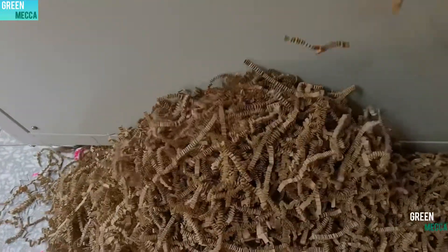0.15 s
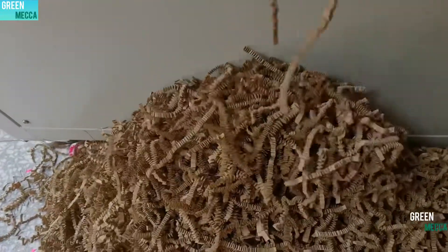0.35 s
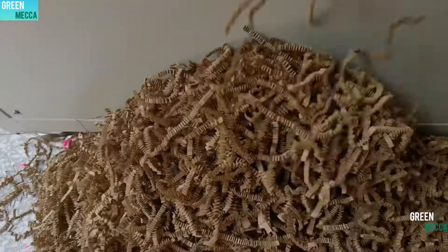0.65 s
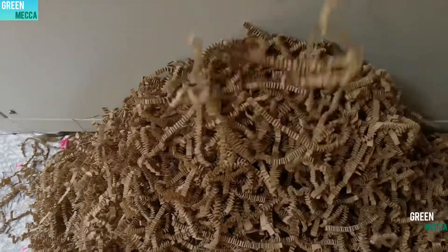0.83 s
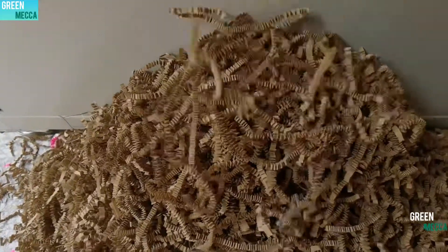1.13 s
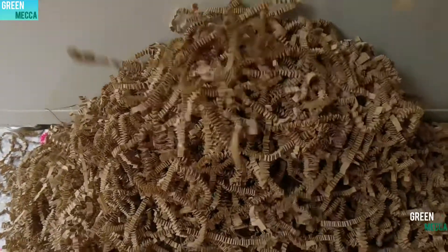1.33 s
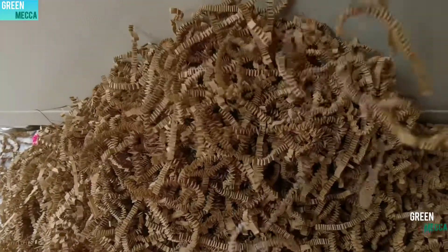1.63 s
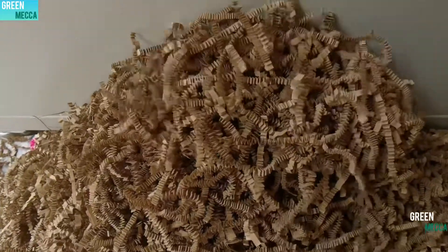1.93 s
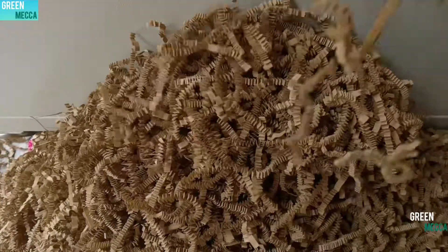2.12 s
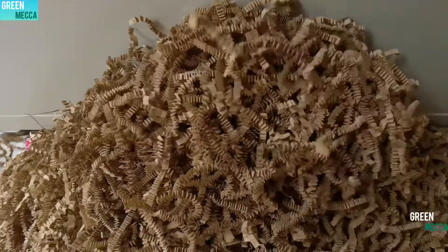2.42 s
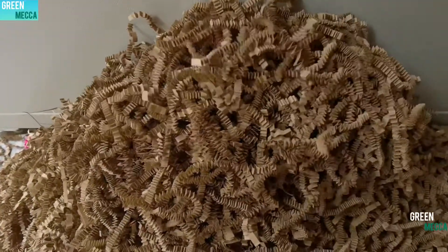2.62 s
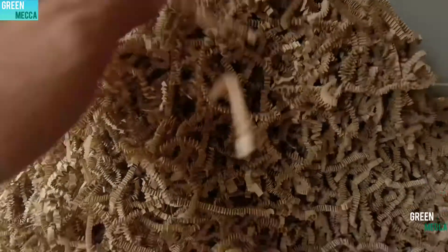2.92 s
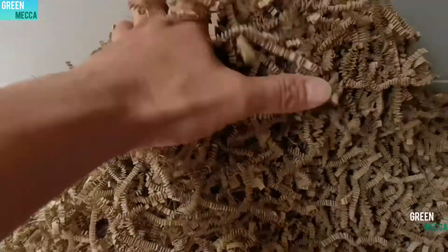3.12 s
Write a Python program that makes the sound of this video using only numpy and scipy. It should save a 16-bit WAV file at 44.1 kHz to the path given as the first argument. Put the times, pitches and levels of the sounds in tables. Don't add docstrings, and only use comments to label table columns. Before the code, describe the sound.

Close stereo pickup of a shredding machine indoors: constant low mains hum, muffled casing roar, faint wavering bearing whine and fine rattle, with scattered dull knocks of falling strips and a tiny squeak at the end.

```python
import sys
import numpy as np
from scipy import signal
from scipy.fft import rfft, irfft, next_fast_len
from scipy.io import wavfile
from scipy.ndimage import uniform_filter1d, map_coordinates

SR = 44100
rng = np.random.default_rng(int(sys.argv[2]) if len(sys.argv) > 2 else 0)


def generate_wav(signal):
    frames = np.transpose(np.atleast_2d(signal))
    scaled = np.clip(frames, -1, 1) * 32767
    pcm = np.round(scaled).astype(np.int16)
    wavfile.write(sys.argv[1], SR, pcm)


def volts(x):
    e = np.asarray(x, float) / 20
    return 10 ** e


N = 143766

# t/s, hum level/dB, octave level/dB
MAGNETIC_PULL = [(0.1, -10, -36.5), (0.32, -12, -40.5), (0.39, -13, -31.5), (0.66, -9, -35),
                 (0.69, -10.5, -34), (0.9, -12.5, -32.5), (1.28, -9, -39), (1.47, -15, -32),
                 (1.75, -10, -34.5), (1.77, -9.5, -38.5), (2.1, -13, -30.5), (2.17, -10.5, -44),
                 (2.25, -10, -34), (2.32, -9, -46), (2.6, -13, -31.5), (2.89, -9, -37), (2.94, -11, -37),
                 (3.15, -12, -33.5)]
# multiple of the hum, level/dB, left minus right/dB
HUM_OVERTONES = [(4, -40.5, 20)]
# multiple of the rotor rate, level/dB, left minus right/dB
ROTOR_LINES = [(21, -56.5, 7), (27, -49.5, -2), (29, -52, 9)]
# t/s, third overtone level/dB, frame mode level/dB, slot line level/dB, lid mode level/dB
FRAME_STRAIN = [(0.0, -51, -40, -45, -44), (0.04, -37, -24, -51, -53), (0.14, -39, -44, -40, -31),
                (0.24, -59, -31, -46, -38), (0.56, -32.5, -42, -48, -36), (0.6, -40, -32, -47, -58),
                (0.68, -36, -43, -38, -34.5), (1.71, -41, -43, -45.5, -54), (1.76, -26, -40, -53, -50),
                (1.82, -59, -33, -35, -39), (1.95, -36.5, -55, -41.5, -54), (2.21, -40, -31, -48, -48),
                (2.45, -37.5, -54, -44, -33), (2.55, -32, -42, -57, -58), (2.65, -49, -46, -55, -42),
                (2.83, -43.5, -34.5, -36, -41), (3.11, -38.5, -54, -48, -55), (3.26, -45, -47, -34, -48)]
# order, level/dB
MESH_ORDERS = [(2, -43), (3, -31.5), (4, -40), (5, -47.5), (8, -43.5), (9, -46), (10, -98)]
# t/s, cutting level/dB, bearing level/dB, air level/dB, frame shake level/dB
MACHINE_LOAD = [(0.05, -37, -43.5, -55, -23), (0.23, -33, -60, -51.5, -39), (0.29, -39, -39, -56, -29),
                (0.41, -39.5, -54, -52, -23), (0.51, -37.5, -42, -55, -21.5), (0.7, -33, -48.5, -51.5, -32),
                (1.0, -37.5, -55, -55, -30.5), (1.03, -32.5, -44, -53, -31.5),
                (1.36, -37, -55.5, -54, -29.5), (2.08, -35, -54, -54, -31.5), (2.13, -35, -50, -52, -40),
                (2.21, -35, -61, -53.5, -15.5), (2.25, -36, -47, -53.5, -28), (2.43, -34, -48, -53, -31),
                (2.56, -38, -58, -55.5, -26), (2.84, -32.5, -47, -53, -29.5), (2.91, -34, -43, -52, -40.5),
                (3.15, -40.5, -48.5, -54.5, -31)]
# f/Hz, level/dB
RUMBLE_COLOUR = [(20, -120), (30, -9.5), (70, -17.5), (115, -3), (140, 1.5), (165, -6.5), (190, -1),
                 (240, -9), (300, -120)]
# f/Hz, level/dB
ROAR_COLOUR = [(150, -120), (240, -3.5), (310, -1.5), (430, -5.5), (550, -12), (620, -4.5), (720, -6),
               (800, -12), (1500, -14), (1750, -120)]
# f/Hz, level/dB
HISS_COLOUR = [(1200, -120), (1600, 0.5), (2400, -1.5), (4000, -3), (5000, -5), (6000, -3), (7600, -8),
               (8600, -22.5), (10000, -120)]
# f/Hz, level/dB
AIR_COLOUR = [(6000, -120), (8000, -1.5), (9400, -3.5), (10200, -0.5), (11500, -4), (12300, 0), (14600, -1),
              (15750, 2)]
PANEL_HZ = [860, 1100, 1330, 1535, 2290, 2772, 4530, 5820, 10185, 14060]
# bandwidth/Hz, level/dB
PANEL_RINGS = [(77, -53), (60, -49), (80, -49.5), (45, -48), (170, -51), (55, -53.5), (90, -57.5),
               (260, -54.5), (80, -63), (150, -62)]
# f/Hz, bandwidth/Hz, level/dB
ROOM_MODES = [(137.5, 4.7, -47), (180.3, 3.5, -39), (228, 6.4, -49.5), (248.3, 3.1, -45.5),
              (409, 12, -54.5), (440.4, 7.7, -42.5), (499, 42, -45), (602.5, 11, -50)]
# f/Hz, bandwidth/Hz, level/dB
CROSS_MODE = (163, 8, -47)
# f/Hz, coherence
COHERENCE = [(30, .93), (130, .995), (290, .85), (640, .65), (1410, .3), (3100, .3), (6820, .25),
             (15000, .3)]
# f/Hz, left minus right/dB
LEFT_LEAN = [(60, 1.3), (140, 1.8), (220, 3.5), (380, 5.5), (700, 4.5), (1290, 5.5), (2380, 3.5), (5000, 6),
             (9000, 2), (15000, 1.5)]
# t/s, duration/s, level/dB, f/Hz
SLIDES = [
    (.12, .17, -38, 1150),
    (0.803, 0.063, -40, 3240),
    (3.1, 0.1, -47, 2037),
    (1.077, 0.086, -50, 1200),
    (1.6, 0.13, -52, 1300),
    (2.303, 0.16, -50, 1200),
]
# t/s, peak level/dB, f/Hz
KNOCKS = [(0.196, -32, 960), (.658, -20, 860), (.82, -26, 666), (0.835, -31, 3180), (.77, -34, 640),
          (.873, -35, 700), (0.57, -30, 301), (1.068, -30, 401), (2.158, -28, 385), (2.677, -31, 716),
          (2.737, -19, 393), (1.312, -27.5, 1450), (1.755, -31, 1350), (1.85, -24.5, 696),
          (2.715, -30.5, 2200), (2.88, -29, 690), (3.164, -26, 750)]

HUM_HZ, HUM_PEAK_S = 99.96, -.0013
ROTOR_HZ, CUTTER_HZ = 24.99, 1.79
MESH_HZ, MESH_PEAK_S = 35.89, -.00024
WHINE_HZ = 4275
PORT_LAG_S = .00017


def unit(x):
    return x / np.sqrt(np.mean(x ** 2) + 1e-20)


def along(points, hz):
    f, v = np.transpose(points)
    return np.interp(np.log(hz + 1), np.log(f + 1), v)


def curves(rows):
    s, *cols = np.transpose(rows)
    t = np.arange(N) / SR
    return [uniform_filter1d(np.interp(t, s, c), size=2000) for c in cols]


def wobble(rate):
    knots = rng.standard_normal(int(N * rate / SR) + 4)
    return map_coordinates(knots, [np.arange(N) * rate / SR])


def filtered(x, response):
    m = next_fast_len(N + 8192)
    return irfft(rfft(x, m) * response(np.fft.rfftfreq(m, 1 / SR)), m)[..., :N]


def tone(cycles, pan_db, lead):
    half = np.array([[.5], [-.5]])
    return np.sqrt(2) * volts(pan_db * half) * np.cos(2 * np.pi * cycles + lead * half)


def rush(gain, patchy_db=0):
    z = signal.stft(rng.standard_normal((2, N)), nperseg=512)[2]
    field = rng.standard_normal(z.shape[1:])
    field = uniform_filter1d(uniform_filter1d(field, size=6, axis=0), size=10, axis=1)
    pair = signal.istft(z * volts(patchy_db * unit(field)), nperseg=512)[1][:, :N]

    def mid_side_gain(hz):
        turn = np.arccos(np.clip(along(COHERENCE, hz), -1, 1)) / 2
        return gain(hz) * np.array([np.cos(turn), np.sin(turn)])

    def placing(hz):
        lean = volts(along(LEFT_LEAN, hz) * [[.5], [-.5]])
        quarter_at_most = np.minimum(hz * PORT_LAG_S, 1 / 4)
        return lean * np.exp(1j * np.pi * quarter_at_most * [[1], [-1]])

    mid, side = filtered(pair, mid_side_gain)
    return unit(filtered(np.array([mid + side, mid - side]), placing))


def ringing(modes, patchy_db):
    hz, width, db = np.transpose(modes)[..., None]

    def gain(f):
        power = volts(db) ** 2 / width / (1 + (2 * (f - hz) / width) ** 2) ** 2
        return np.sqrt(np.sum(power, axis=0))

    return np.linalg.norm(volts(db)) * rush(gain, patchy_db=patchy_db)


def load():
    cut_db, bearing_db, air_db, shake_db = curves(MACHINE_LOAD)
    t = np.arange(N) / SR
    return t, cut_db - cut_db.mean(), bearing_db, air_db - air_db.mean(), shake_db - shake_db.mean()


def motor():
    t, (hum_db, octave_db) = np.arange(N) / SR, curves(MAGNETIC_PULL)
    shake_db = load()[4]
    cycles = HUM_HZ * (t - HUM_PEAK_S)
    out = volts(hum_db) * tone(cycles, 1.9, .18)
    waver_db, drift = 3 * wobble(22), .05 * wobble(8)
    out += volts(octave_db + 3.5 + waver_db) * tone(2 * cycles + drift, 4.5, 0.069)
    for k, db, pan_db in HUM_OVERTONES:
        level_db = hum_db.mean() + db + 4.2 * wobble(5.7) + 1.1 * shake_db
        out += volts(level_db) * tone(k * cycles + 0.22 * wobble(7.0), pan_db, 0.43)
    for k, db, pan_db in ROTOR_LINES:
        flutter_db = 2.5 * wobble(7)
        out += volts(db + flutter_db) * tone(k * ROTOR_HZ * t + rng.random(), pan_db, 0.22)
    return out


def strain():
    t, (third_db, frame_db, slot_db, lid_db) = np.arange(N) / SR, curves(FRAME_STRAIN)
    third_cycles = 3 * HUM_HZ * (t - HUM_PEAK_S) + .1 * wobble(10)
    slot_cycles = 28 * ROTOR_HZ * t + .1 * wobble(10)
    out = volts(third_db - 0.5 + 3.5 * wobble(22)) * tone(third_cycles, 3.3, 0.25)
    out += volts(slot_db - 3.5 + 3.5 * wobble(18)) * tone(slot_cycles, 2.5, 0.31)
    out += volts(lid_db) * ringing([(606, 27, -1)], patchy_db=1)
    return out + volts(frame_db) * ringing([(387, 62, -1.5)], patchy_db=3)


def gears():
    t, out = np.arange(N) / SR, 0
    for k, db in MESH_ORDERS:
        swell_db = 3.5 * np.cos(2 * np.pi * (CUTTER_HZ * t + rng.random()))
        if k == 3:
            swell_db = 0
        out = out + volts(db + swell_db) * tone(k * MESH_HZ * (t - MESH_PEAK_S), 0.61 * k, .08)
    return out


def cutters():
    t, cut_db, _, air_db, shake_db = load()
    beat = np.cos(2 * np.pi * ROTOR_HZ * t)

    def noise(colour, patchy_db=0):
        return rush(lambda hz: volts(along(colour, hz)), patchy_db)

    rumble_db = -32 + 0.65 * wobble(2.2)
    roar_db = -33 + .5 * cut_db + 0.29 * shake_db + 1.0 * wobble(21) + 0.27 * beat
    hiss_db = -38.5 + 0.53 * cut_db + 0.15 * wobble(1.93) + 0.59 * wobble(18) + 0.39 * beat
    cooling_db = -44.5 + 1.1 * air_db + .6 * wobble(10) + .6 * beat
    out = volts(rumble_db) * noise(RUMBLE_COLOUR)
    out += volts(roar_db) * noise(ROAR_COLOUR, 0.8)
    out += volts(hiss_db) * noise(HISS_COLOUR, 1.1)
    out += volts(cooling_db) * noise(AIR_COLOUR, 1.6)
    out += volts(0.5 * cut_db) * ringing(np.c_[PANEL_HZ, PANEL_RINGS], patchy_db=2)
    out += volts(0.38 * shake_db) * ringing(ROOM_MODES, patchy_db=3.0)
    return out + ringing([CROSS_MODE], patchy_db=-7)[0] * [[1.3], [-.7]]


def bearing():
    t, _, bearing_db, *_ = load()
    line = volts(3 * wobble(15)) * tone(WHINE_HZ * t + .15 * wobble(15), 4, 1.5)
    sideband_cycles = (WHINE_HZ + 2 * ROTOR_HZ) * t + .2 * wobble(20)
    line += volts(-5 + 3 * wobble(15)) * tone(sideband_cycles, 4, 1.5)
    fuzz = ringing([(WHINE_HZ + 10, 130, 0)], patchy_db=2.5)
    mean_db = bearing_db.mean()
    level_db = mean_db + 1.0 + .65 * (bearing_db - mean_db)
    return volts(level_db) * (volts(-5.5) * line + fuzz)


def rattle(count=500, size=2048):
    u, g = rng.random((count, 2)), rng.standard_normal((count, 2))
    hz, t = 1225 * np.exp(0.398 * g[:, :1]), np.arange(size) / SR
    size_db = -2.5 * np.log(np.clip(u[:, 1:], 1 / 10, 1))
    decay_db = 60 * t * hz / 45
    rings = volts(size_db - decay_db) * np.sin(2 * np.pi * hz * t) * 1000 / hz
    at = ((u[:, :1] * N).astype(int) + np.arange(size)).ravel()
    pair = []
    for side in (1, -1):
        placed = rings * volts(side * (1.0 + 4.0 * g[:, 1:]))
        pair.append(np.bincount(at, placed.ravel(), N + size)[:N])
    return volts(-45.5 + 1.0 * load()[1]) * unit(np.array(pair))


def rustles():
    t, out = np.arange(N) / SR, 0
    for s, length, db, hz in SLIDES:
        swell = np.sin(np.pi * np.clip((t - s) / length, 0, 1)) ** 2
        grain = volts(db + 2 * wobble(150))
        out = out + swell * grain * rush(lambda f: np.exp(-(np.log((f + 1) / hz) / 0.45) ** 2))
    return out


def knocks(size=8192):
    age, f = np.arange(size) / SR, np.fft.rfftfreq(size, 1 / SR)
    out = np.zeros((2, N + size))
    t60_s, rise_s = .07, .0008
    for s, db, hz in KNOCKS:
        shape = volts(db + 2 - 60 * age / t60_s) * (1 - np.exp(-age / rise_s))
        band = 1 / (1 + ((f - hz) / (0.3 * hz)) ** 2)
        puff = unit(irfft(rfft(rng.standard_normal((2, size))) * band, size))
        pitch = 0.49 * (hz < 900) * tone(hz * age, 4.0, 0.43)
        start = round(s * SR)
        out[:, start:start + size] += shape * (pitch + 0.65 * volts([[2], [-2]]) * puff)
    return out[:, :N]


def hand():
    t = np.arange(N) / SR
    u = np.clip((t - 3.2) / 0.06, 0, 1)
    squeak = volts(-37) * tone(15650 * t + .1 * wobble(60), 2, .5)
    rustle = volts(-52) * rush(lambda f: np.exp(-((f - 13300) / 700) ** 2))
    return np.sin(np.pi * u ** .7) ** 2 * squeak + u * rustle


def scene():
    return motor() + strain() + gears() + cutters() + bearing() + rattle() + rustles() + knocks() + hand()


def top_cut(x):
    return signal.sosfilt(signal.butter(12, 15730, fs=SR, output="sos"), x)


def record(dry):
    mix = filtered(dry, lambda hz: hz < 15740)
    return top_cut(mix)


dry = scene()
out = record(dry)
generate_wav(out)
```